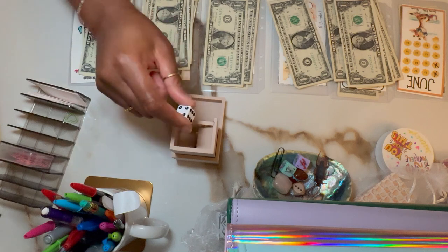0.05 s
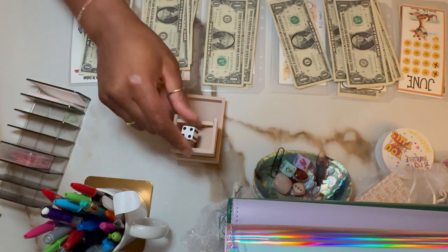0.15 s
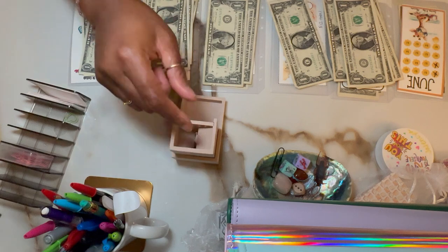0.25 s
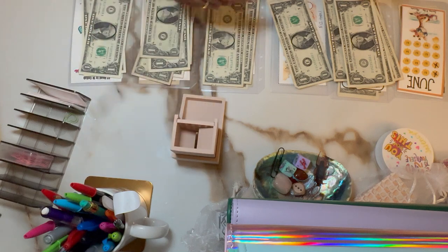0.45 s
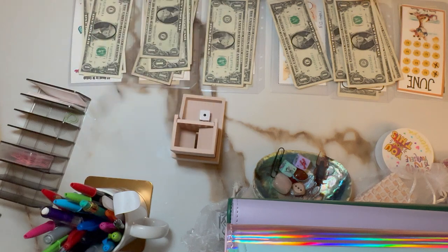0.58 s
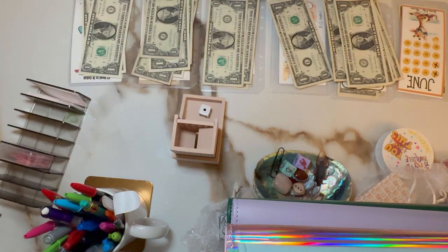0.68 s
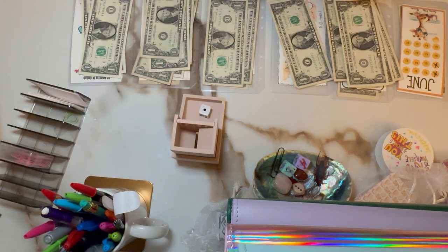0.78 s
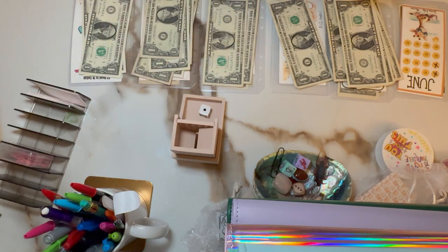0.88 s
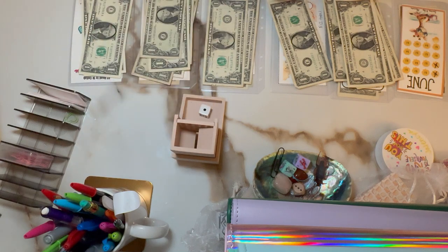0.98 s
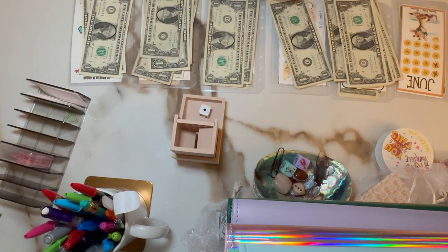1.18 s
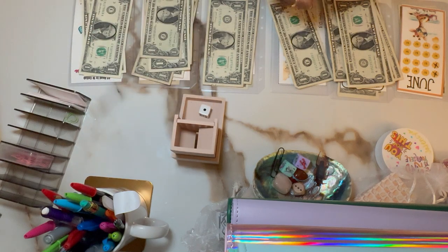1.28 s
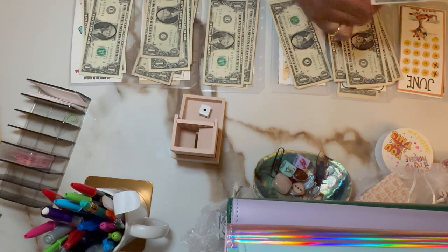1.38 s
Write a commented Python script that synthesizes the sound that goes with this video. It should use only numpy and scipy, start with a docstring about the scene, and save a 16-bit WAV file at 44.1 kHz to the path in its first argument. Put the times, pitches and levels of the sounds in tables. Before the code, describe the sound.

A single die drops into a small wooden dice box, clacking rapidly and brightly for under half a second, then settling; soft taps and faint paper rustle follow in a small hard-walled room, close stereo microphone.

```python
"""A die clacks down the baffles of a small wooden dice box and rolls to rest in its tray.
Each clack or early echo is a set of dying tones (the box's modes) plus a hard tick of noise, answered by a
hard-walled room made of fading noise. Nearby, taps are short noise puffs and paper and cloth are patchy noise.
Under it all lie a low room rumble and a faint hiss, both shaped noise."""
import sys
import numpy as np
from scipy import signal
from scipy.fft import rfft, irfft, next_fast_len
from scipy.io import wavfile
from scipy.ndimage import uniform_filter1d

SR = 44100
rng = np.random.default_rng(int(sys.argv[2]) if len(sys.argv) > 2 else 0)


def log_audio(samples):
    """Write samples as a 16-bit WAV file to the path given in sys.argv[1]."""
    # one column per channel
    frames = np.atleast_2d(samples).T
    # limit to full scale, then quantise
    limited = np.clip(frames, -1, 1)
    pcm = np.round(limited * 32767).astype(np.int16)
    wavfile.write(sys.argv[1], SR, pcm)


N = 63945  # length in samples
ATTACK_S = .001  # time constant of the soft start of a sound

# Tone colour of paper and cloth, shared by the rustle and the taps: f/Hz, relative level/dB
RUSTLE_COLOUR = [(240, -49), (400, -8.5), (740, 3.5), (1920, -0.5), (5810, 1.5), (13500, -15), (15800, -44)]


def amp(db):
    """Turn decibels into an amplitude factor."""
    return 10 ** (np.asarray(db) / 20)


def unit(x):
    """Scale to an rms of 1."""
    return x / np.sqrt(np.mean(x ** 2) + 1e-20)


def along(points, hz):
    """Read a value at hz from (f/Hz, value) points, on a log frequency axis."""
    f, v = np.transpose(points)
    return np.interp(np.log(hz + 1), np.log(f + 1), v)


def filtered(x, response):
    """Multiply the spectrum of x by a response, given as a function of frequency."""
    n = x.shape[-1]
    padded = next_fast_len(n + 4096)
    hz = np.fft.rfftfreq(padded, 1 / SR)
    return irfft(rfft(x, padded) * response(hz), padded)[..., :n]


def rush(spectrum, alike):
    """Steady stereo noise of rms 1; alike is the left-right likeness (1 is mono)."""
    turn = np.arccos(np.clip(alike, -1, 1)) / 2
    closed = [(spectrum[0][0] * 0.45, -60)] + list(spectrum)  # fades out below the first point
    noise = filtered(rng.standard_normal((2, N)), lambda hz: amp(along(closed, hz)))
    mid = noise[0] * np.cos(turn)
    side = noise[1] * np.sin(turn)
    return unit(np.array([mid + side, mid - side]))


def add(out, s, sound):
    """Mix a stereo sound into out at time s."""
    i = round(s * SR)
    out[:, i:i + sound.shape[1]] += sound[:, :out.shape[1] - i]


def die():
    """Each clack or early echo sounds the wooden box's modes, slightly detuned anew, and adds a hard tick.
    A high favoured mode beams at the microphone; the room gets high modes unboosted, spread in pitch."""
    # Clacks and their early echoes: t/s, level/dB, favoured mode f/Hz, then thud, hollow knock,
    # wall ring, bright ring and tick, each a relative level/dB
    clacks = [(0.2264, -12, 4300, -12, -5, 11, -1, 5.5), (0.2342, -12.5, 2100, -18, -18.5, 10, -34, -13),
              (0.2393, -15, 5750, 8, -25, -3, 5, -26), (0.2495, -17, 2730, -7, 5, 1.5, 8, -2),
              (0.274, -19, 1245, 10.5, 3.5, -14, 4, -24), (0.3038, -9, 1360, -7, 0, 1, 5, 0.5),
              (0.313, -26, 3300, -22, -7, 13.5, 21, -19), (.3160, -15.5, 6350, -20, -14, 10.5, 8, 4),
              (0.3719, -8, 4700, 1.5, -5.5, 1, -11, 3), (0.3788, -20.5, 2730, 11.5, -18, 6.5, -18, -19),
              (0.3981, -18.5, 5630, -40, -7, 5.5, 6, 0.5), (0.426, -18, 5750, -12, 0, 7.5, 1.5, 6.5),
              (0.4351, -18, 2084, -12, -15, 4.5, 1, 4), (0.4429, -23.5, 3300, -30, -6, 7, -11, -29),
              (0.486, -19.5, 3900, -27, -12, 9, 11.5, 0), (0.494, -10.5, 3440, -15, -15, 8.5, -21.5, -17),
              (0.5001, -21.5, 2370, -5, -25, 15, -19, 2.5), (0.5392, -20.5, 1500, 13, 4, 6, 4, -28),
              (0.56, -26, 2370, 10, 0, 7, -16, -18), (0.5772, -20, 4800, 8, 2, 17.5, -7, -0.5),
              (.5850, -18.5, 2370, 12, 8.5, 8, 10, -18), (0.613, -28.5, 5070, -21, 5, 12.5, 6, 1),
              (0.6191, -21.5, 2370, 8, 3, 9.5, 7, -14), (.6960, -37, 3300, -20, 9.5, 11, -6, -1)]
    # Centres of the thud, hollow knock, wall ring and bright ring: f/Hz
    group_hz = [600, 1350, 2600, 5300]
    # Modes of the box: f/Hz, relative level/dB
    box = [(230, -6), (520, -11), (1010, -6.5), (1245, -5.5), (1375, -6), (1500, -2.5), (1800, -4.5),
           (2100, -3.5), (2370, -2.5), (2730, -2.5), (3300, -2.5), (3900, -2.5), (4330, -3.5), (4700, -3),
           (5750, -2), (6350, -6.5), (6950, -6)]
    # Ring times before the tray damps them: f/Hz, time to fall 60 dB/s
    ring_times = [(560, .012), (1010, .025), (1350, .05), (1600, .035), (2400, .028), (6000, .018)]
    # Tone colour of the hard tick: f/Hz, relative level/dB
    tick_colour = [(2000, -2.5), (6000, 7.5), (9000, -1), (12500, 4.5), (14000, -5), (15000, -28)]
    ring_db, ring_scatter_db, port_scatter_db = -9, 2, 2  # a port is one stereo channel
    pitch_scatter, port_phase = .01, 0.83  # share of the pitch; phase spread between ports in radians
    favour_db, favour_per_db = 18, .5  # boost of a full-scale blow, its fall per dB of softer blows
    tray_s, tray_damping = .45, .3  # from here the desk damps the tray: share of the ring time left
    beam_hz = 1600  # modes below this radiate alike in all directions
    spread_t60_s = .008  # toward the walls, high modes overlap into a short broad clack
    tick_base_db, tick_t60_s, room_db = -1.5, 0.012, 0.5

    out, t = np.zeros((2, N)), np.arange(SR // 10) / SR
    mode_hz, level_db = np.transpose(box)[:, :, None]
    rise = 1 - np.exp(-t / ATTACK_S)
    for s, db, favoured_hz, *group_db, tick_db in clacks:
        hz = mode_hz * (1 + rng.normal(0, pitch_scatter, mode_hz.shape))
        struck_db = level_db + along(list(zip(group_hz, group_db)), mode_hz)
        struck_db = struck_db + rng.normal(0, ring_scatter_db, hz.shape)
        distance = np.abs(mode_hz - favoured_hz)
        favoured = distance == distance.min()
        hz[favoured] = favoured_hz

        port_db = rng.normal(0, port_scatter_db, (2, len(hz), 1))
        phase = rng.uniform(0, 2 * np.pi, hz.shape)
        phase = phase + rng.normal(0, port_phase, port_db.shape) * ~favoured
        tones = amp(ring_db + struck_db + port_db) * np.sin(2 * np.pi * hz * t + phase) * rise

        t60 = along(ring_times, hz) * (tray_damping if s > tray_s else 1)
        boost_db = (favour_db + favour_per_db * db) * favoured
        modes = tones * amp(boost_db - 60 * t / t60)
        # a ring of fixed short length, its level set to hold about the same energy
        fixed_ring = tones * np.sqrt(t60 / spread_t60_s) * amp(-60 * t / spread_t60_s)
        spread = np.where(hz < beam_hz, modes, fixed_ring)

        noise = unit(filtered(rng.standard_normal(len(t)), lambda f: amp(along(tick_colour, f))))
        tick_rise = 1 - np.exp(-2 * t / ATTACK_S)  # twice as quick as the tones
        tick = amp(tick_base_db + tick_db - 60 * t / tick_t60_s) * noise * tick_rise
        clack = in_room(modes.sum(axis=1) + tick, spread.sum(axis=1) + tick, room_db)
        add(out, s, amp(db) * clack)
    return out


def taps():
    """Soft taps nearby: short noise puffs around a centre pitch, with a broad rustly part under it."""
    # Taps: t/s, level/dB, centre f/Hz
    tap_list = [(0.826, -36, 695), (.896, -38.5, 710), (.904, -39.5, 3830), (0.986, -38, 860),
                (0.99, -38.5, 2350), (1.009, -29, 814), (1.017, -32.5, 1940), (1.06, -36, 4500),
                (1.119, -38, 790), (1.141, -23, 5540), (1.148, -31.5, 3770), (1.196, -37, 4800),
                (1.312, -30.5, 4300), (1.332, -38, 2300), (1.348, -42, 3530)]
    width, broad_db = .16, -11  # natural-log width of the pitched part; level of the broad part
    left_db, t60_s, room_db = -2, 0.03, -8  # the right gets the opposite of left_db
    out, t = np.zeros((2, N)), np.arange(SR // 8) / SR
    envelope = amp(-60 * t / t60_s) * (1 - np.exp(-t / ATTACK_S))
    for s, db, centre_hz in tap_list:
        def band(f):
            """Pitched hump plus broad part."""
            pitched = np.exp(-(np.log((f + 1) / centre_hz) / width) ** 2)
            return pitched + amp(broad_db + along(RUSTLE_COLOUR, f))

        noise = unit(filtered(rng.standard_normal(len(t)), band))
        puff = noise * envelope * amp([[left_db], [-left_db]])
        add(out, s, amp(db) * in_room(puff, puff, room_db))
    return out


def in_room(sound, sent, room_db):
    """Direct sound plus wall reflections of what is sent: fresh fading noise, partly shared by both ports."""
    # How fast the room fades: f/Hz, time to fall 60 dB/s
    fade_times = [(1400, 0.29), (4000, 0.28), (8000, 0.25), (14000, 0.019)]
    shared = 0.26  # weight of the noise common to both ports
    tilt_db = -8.5  # per octave above 4 kHz
    noise = rng.standard_normal((3, SR // 2))
    hz, t, z = signal.stft(noise[:2] + shared * noise[2], SR, nperseg=256)
    fade_db = -60 * t / along(fade_times, hz)[:, None]
    tail = signal.istft(z * amp(fade_db), SR, nperseg=256)[1]
    tail = tail / np.linalg.norm(tail[0])
    tail = filtered(tail, lambda f: amp(tilt_db * np.log2(np.maximum(f / 4000, 1))))
    late_tail = np.pad(tail, ((0, 0), (100, 0)))  # the walls answer 100 samples later
    out = signal.fftconvolve(sent, amp(room_db) * late_tail, axes=1)
    out[:, :sound.shape[1]] += sound
    return out


def rustle():
    """Paper and cloth noise that starts with the throw, in short crackly patches of shifting colour."""
    # Loudness over time: t/s, level/dB
    swells = [(0.227, -27), (.7, -51), (.76, -46.5), (.86, -57), (.95, -58), (1.063, -44.5), (1.13, -51.5),
              (1.181, -45.5), (1.222, -52), (1.3, -42.5), (1.358, -41.5), (1.432, -59)]
    patch_db = 4.5  # rms depth of the patches
    s, db = np.transpose(swells)
    level_db = np.interp(np.arange(N) / SR, s, db, left=-100)
    z = signal.stft(rush(RUSTLE_COLOUR, alike=0.083), nperseg=256)[2]
    # random gains, smoothed over 6 frequency bins and 2 time frames
    field = uniform_filter1d(rng.standard_normal(z.shape[1:]), size=6, axis=0)
    field = uniform_filter1d(field, size=2, axis=1)
    patchy = signal.istft(z * amp(patch_db * unit(field)), nperseg=256)[1][:, :N]
    return amp(level_db + [[-1.1], [1.1]]) * unit(patchy)


def background():
    """Steady noise: a low rumble, nearly mono and duller on the left, and a faint, wider hiss."""
    # Tone colour of the rumble: f/Hz, relative level/dB
    rumble_colour = [(40, -15), (62, -1), (76, 1), (98, -10), (126, -4), (160, -13), (300, -24),
                     (600, -120)]
    # Tone colour of the hiss: f/Hz, relative level/dB
    hiss_colour = [(200, -22), (332, -12), (912, -16.5), (1040, -20.5), (5970, -32), (15000, -61.5)]
    rumble_db, hiss_db = -41.5, -51  # before the left-right differences
    rumble = amp(rumble_db) * rush(rumble_colour, alike=0.94)
    # left falls and right rises over the octave above 80 Hz
    rumble = filtered(rumble, lambda hz: amp(np.clip(np.log2((hz + 1) / 80), 0, 1) * [[-2.5], [2.5]]))
    hiss = amp(hiss_db) * rush(hiss_colour, alike=0.13) * amp([[-1.5], [1.5]])
    return rumble + hiss


def lagged(x, lag_s):
    """The left port hears x a little after the right: half the lag later on the left, half earlier right."""
    return filtered(x, lambda hz: np.exp(-1j * np.pi * hz * lag_s * np.array([[1], [-1]])))


def scene():
    """Mix the die, a touch louder on the right, with everything around it."""
    box = lagged(die() * amp([[-.9], [.9]]), .00003)  # lag in s
    around = lagged(taps() + rustle() + background(), .00007)
    return box + around


def record(dry):
    """Two narrow dips in the overall tone colour, and a sharp top edge."""
    # Dips: centre f/Hz, width/Hz, gain/dB
    dips = [(5350, 130, -8), (10200, 350, -14)]
    top_hz = 15900

    def response(hz):
        """Bell-shaped dips and a sharp top edge."""
        dip_db = sum(db * np.exp(-((hz - centre) / width) ** 2) for centre, width, db in dips)
        return (hz < top_hz) * amp(dip_db)

    return filtered(dry, response)


dry = scene()
out = record(dry)
log_audio(out)
```